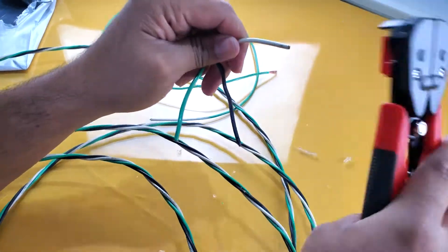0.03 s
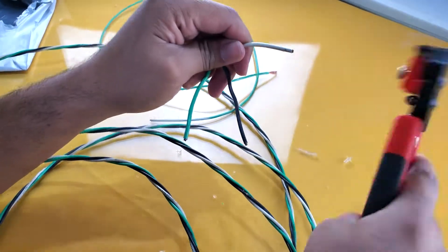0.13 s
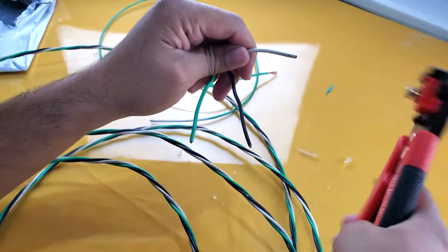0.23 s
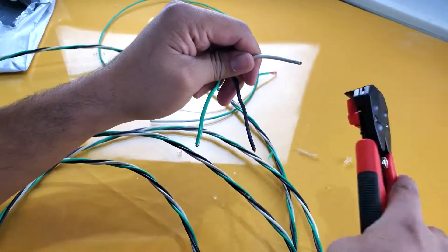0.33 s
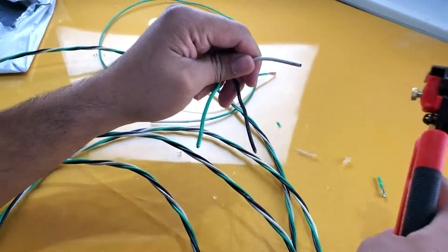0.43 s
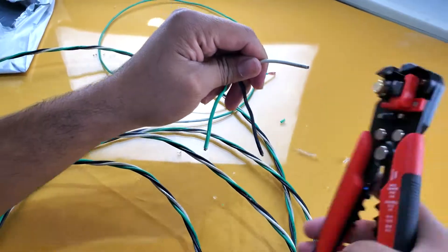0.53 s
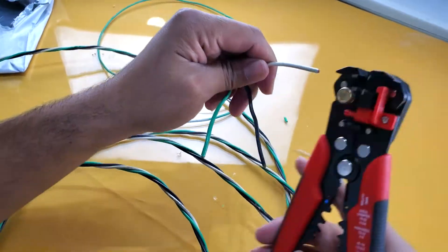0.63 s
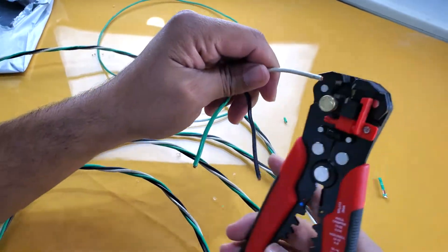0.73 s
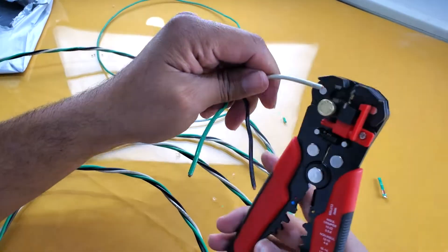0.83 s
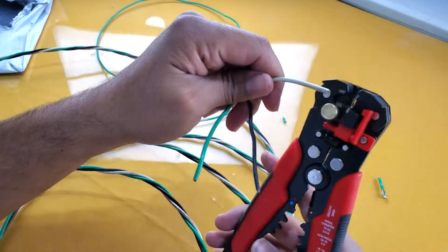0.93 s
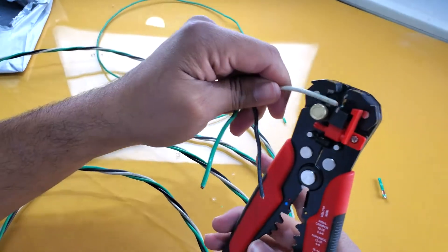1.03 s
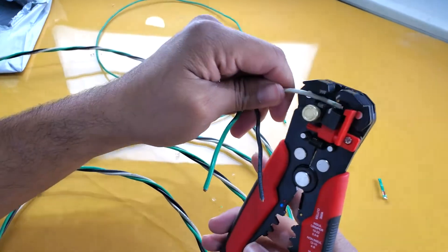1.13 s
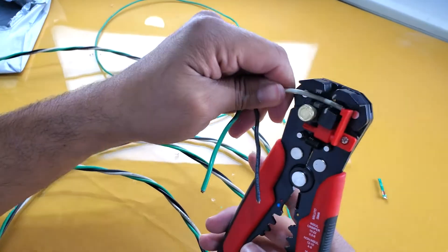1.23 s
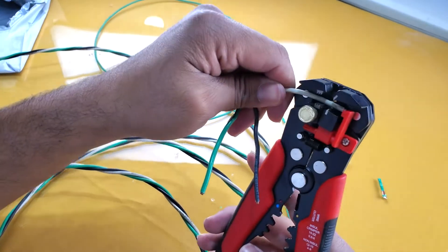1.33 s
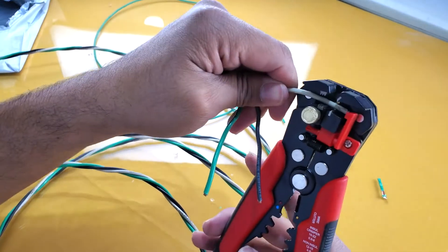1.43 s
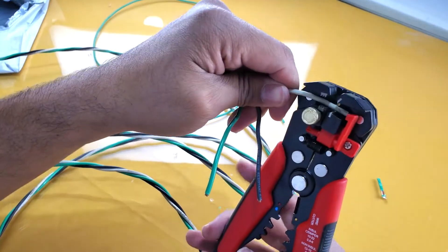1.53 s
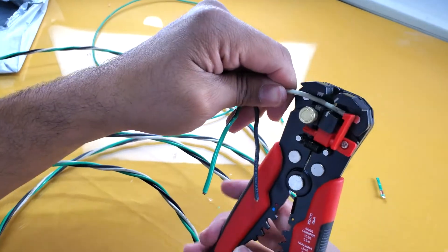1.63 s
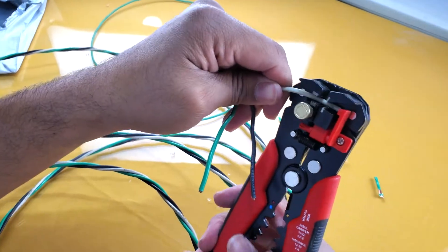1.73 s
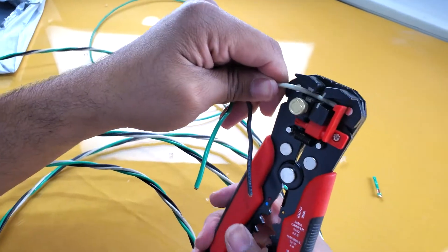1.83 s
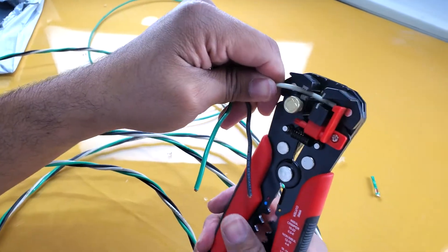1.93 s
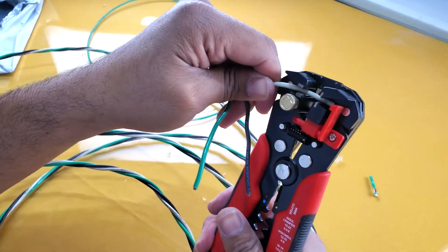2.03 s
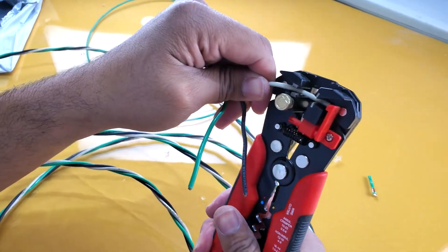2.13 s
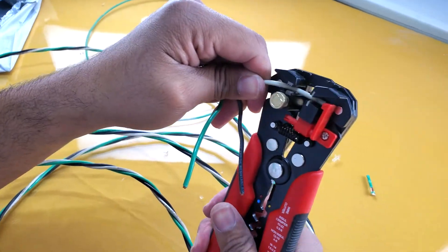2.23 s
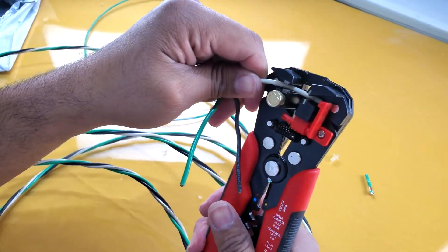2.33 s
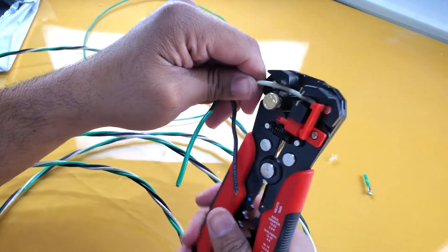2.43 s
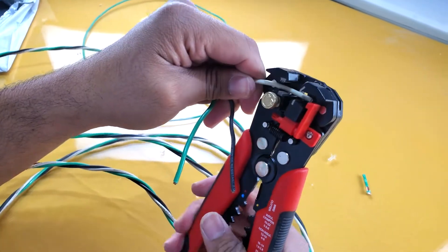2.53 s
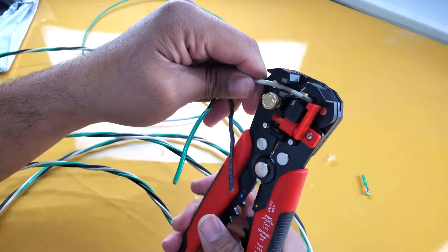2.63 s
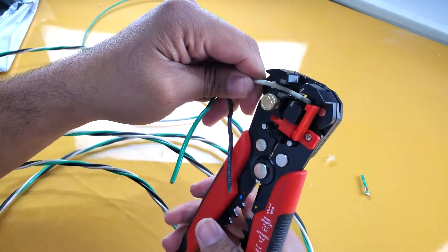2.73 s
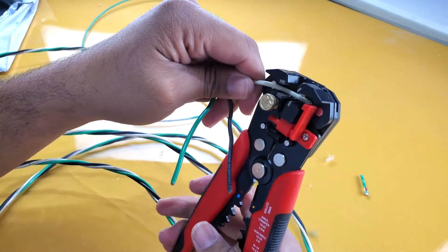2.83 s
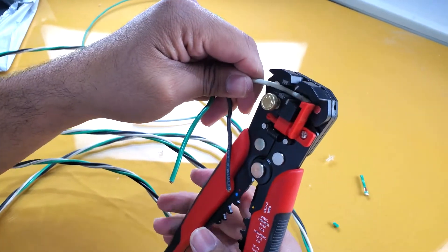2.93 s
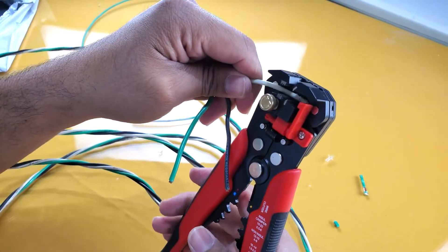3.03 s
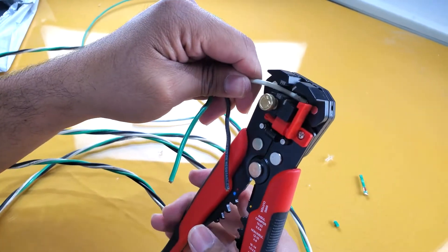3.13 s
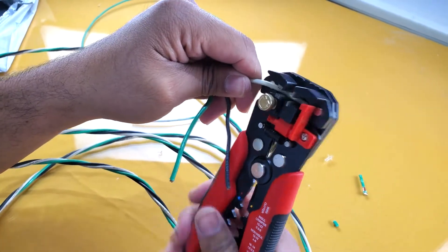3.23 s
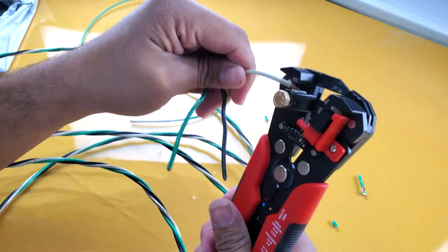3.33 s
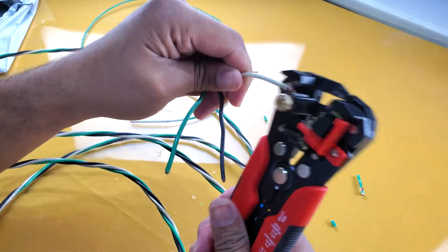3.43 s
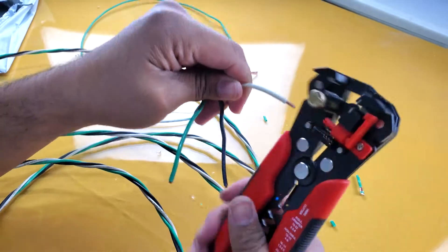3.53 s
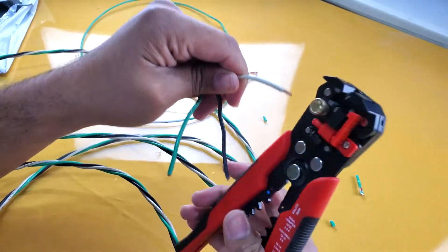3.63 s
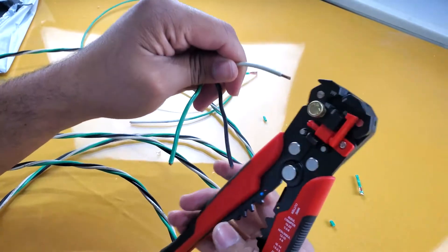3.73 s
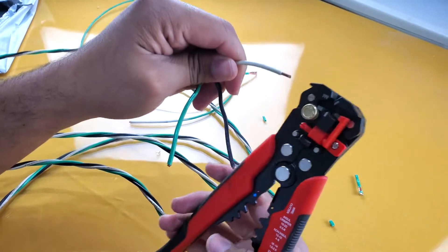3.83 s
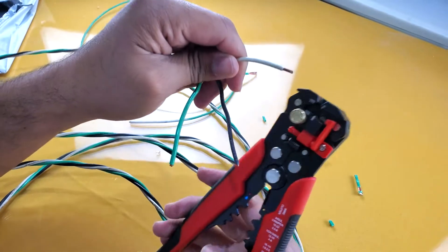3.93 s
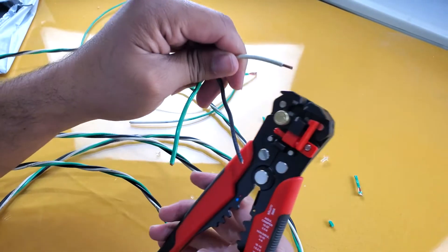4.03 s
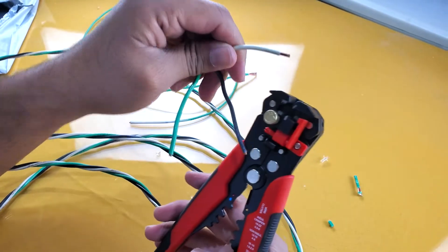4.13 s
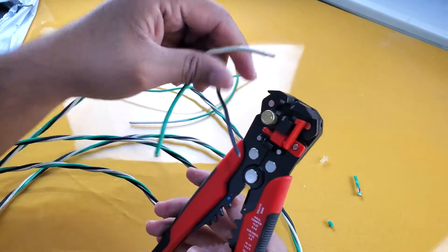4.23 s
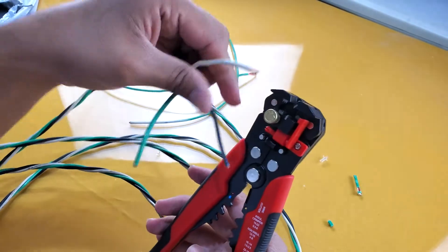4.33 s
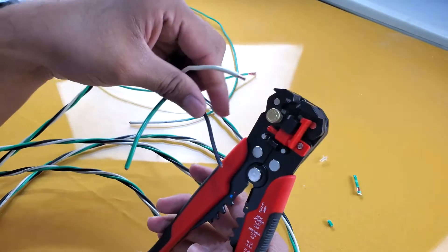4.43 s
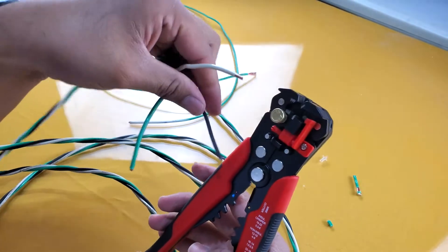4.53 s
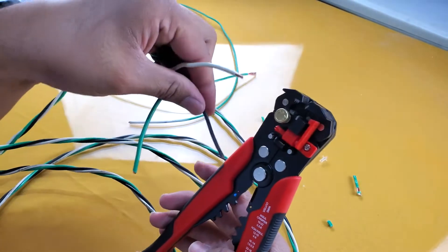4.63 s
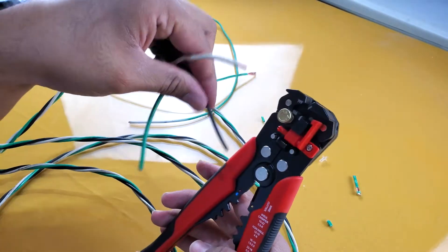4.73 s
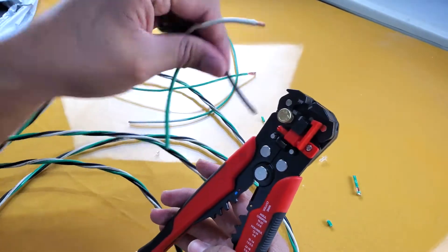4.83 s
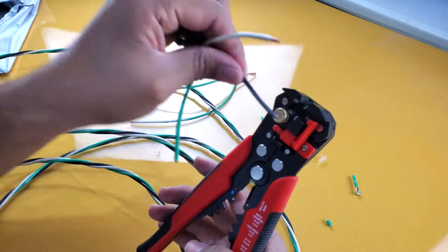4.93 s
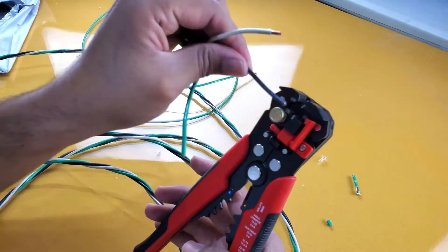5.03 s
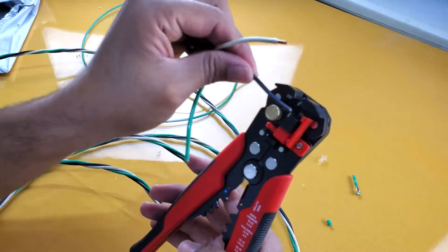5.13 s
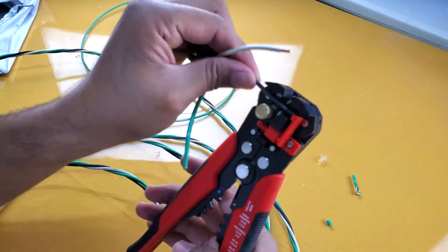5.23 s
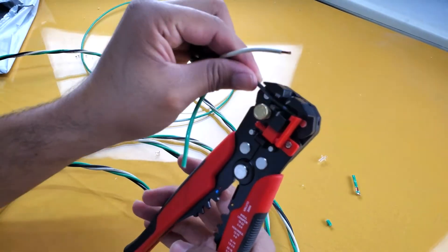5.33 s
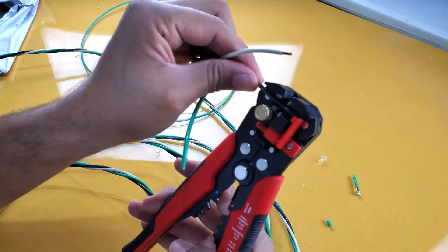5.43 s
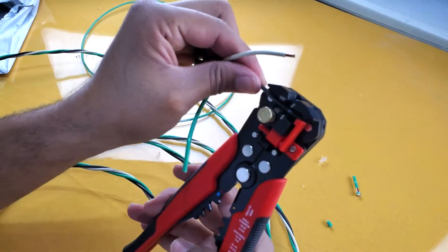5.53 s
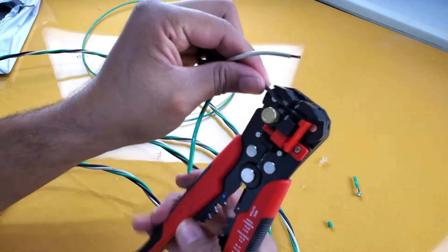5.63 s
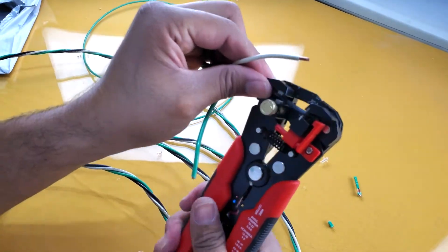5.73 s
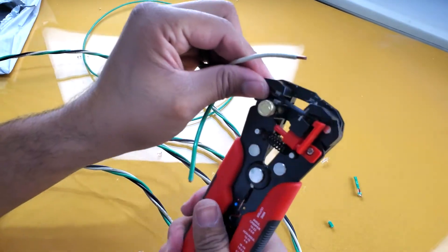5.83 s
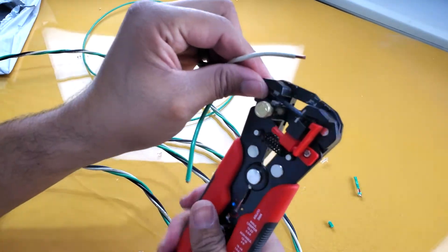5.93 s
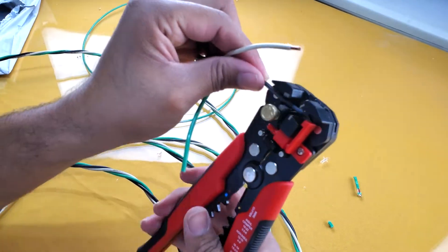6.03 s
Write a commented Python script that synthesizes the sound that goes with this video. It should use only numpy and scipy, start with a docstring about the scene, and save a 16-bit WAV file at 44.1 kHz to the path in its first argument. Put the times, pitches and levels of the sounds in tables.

```python
"""Wire stripper at the bench

Close microphone in a small hard room: a spring-loaded wire stripper is worked by hand over a bench.
Jaws, cam and latch click as bursts of micro-impacts ringing the tool; its spring buzzes, loose parts ping.
Wires rub, squeak and slap as friction noise through resonances; the bench thuds and rumbles under pushes.
The tool has a short echo of decaying noise; shaped noise makes a faint steady hiss below."""
import sys
import numpy as np
from scipy import signal
from scipy.fft import rfft, irfft
from scipy.io import wavfile

SR = 44100
rng = np.random.default_rng(int(sys.argv[2]) if len(sys.argv) > 2 else 0)


def file_out(sig):
    """Save sig as 16-bit WAV at sys.argv[1]."""
    # one column per channel
    cols = np.atleast_2d(sig).T
    # limit, then scale
    lim = np.clip(cols, -1, 1)
    pcm = np.round(lim * 32767).astype(np.int16)
    wavfile.write(sys.argv[1], SR, pcm)


N = 267907


def from_db(db):
    """Decibels become an amplitude gain."""
    return 10 ** (np.asarray(db) / 20)


def rms(x):
    """Root mean square."""
    return np.sqrt(np.mean(x ** 2) + 1e-20)


def rms_one(x):
    """Scaled to rms 1."""
    return x / rms(x)


def at_hz(hz, points, column=1):
    """A table whose first column is frequency, read on a log-frequency axis."""
    points = np.array(points)
    return np.interp(np.log(np.maximum(hz, 1)), np.log(points[:, 0]), points[:, column])


def band(x, low_hz, high_hz, order):
    """Butterworth band-pass."""
    sections = signal.butter(order, [low_hz, high_hz], "band", fs=SR, output="sos")
    return signal.sosfilt(sections, x + 1e-18)


def drift(rate_hz):
    """Slow random wander of rms 1: white noise through two equal low-pass poles."""
    r = np.exp(-2 * np.pi * rate_hz / SR)
    settle = 9000   # samples dropped while the filter settles
    wander = signal.lfilter([1], [1, -2 * r, r * r], rng.standard_normal(N + settle))
    return rms_one(wander[settle:])


def ring(push, hz, t60):
    """A damped mode: a unit click starts a sine of height 1 that falls 60 dB in t60 seconds."""
    r = from_db(-60 / (t60 * SR))
    w = 2 * np.pi * hz / SR
    return signal.lfilter([0, np.sin(w)], [1, -2 * r * np.cos(w), r * r], push + 1e-18)


def resonate(x, peaks):
    """Parallel resonances with alternating signs; the sum has rms 1."""
    out = 0
    for k, (hz, width_hz, level_db) in enumerate(peaks):
        r = np.exp(-np.pi * width_hz / SR)
        poles = [1, -2 * r * np.cos(2 * np.pi * hz / SR), r * r]
        resonance = signal.lfilter([(1 - r * r) / 2, 0, (r * r - 1) / 2], poles, x)
        out = out + (-1) ** k * from_db(level_db) * resonance
    return rms_one(out)


def friction(grain_share, lumpy_db, lump_rate_hz):
    """Sliding noise: a smooth part plus sparse slips of uneven size, coming in lumps."""
    slip_size = from_db(3.5 * np.minimum(rng.exponential(1, N), 4))
    slips = (rng.random(N) < 600 / SR) * rng.standard_normal(N) * slip_size   # about 600 slips a second
    share = np.clip(grain_share, 0, 1)
    mix = np.sqrt(1 - share) * rng.standard_normal(N) + np.sqrt(share) * rms_one(slips)
    return mix * from_db(lumpy_db * drift(lump_rate_hz))


def sliding(peaks, low_hz, high_hz, grain_share):
    """Friction noise heard through a few resonances, at rms 1."""
    coloured = resonate(friction(grain_share, 2.6, 25), peaks)
    return rms_one(band(coloured, low_hz, high_hz, order=2))


def dying(rows):
    """Envelope of sudden starts (t/s, level/dB, t60/s) that die away."""
    t = np.arange(N) / SR
    out = 0
    for s, level_db, t60 in rows:
        out = out + from_db(level_db - 60 * np.abs(t - s) / max(t60, .01)) * (t >= s)
    return out


def swells(rows, column, fall_db_per_s):
    """Envelope of movements that swell at their own pace, hold, and all fade at one rate; powers add."""
    t = np.arange(0, N + 64, 64) / SR   # a coarse grid is enough
    rows = np.array(rows)[:, :, None]
    since = t - rows[:, 0]
    rise_db = 20 * np.minimum(since, 0) / np.maximum(rows[:, 1], .005)
    fall_db = fall_db_per_s * np.maximum(since - np.abs(rows[:, 2]), 0)
    level_db = rows[:, column] + rise_db - fall_db
    envelope = np.sqrt(np.sum(from_db(2 * level_db), axis=0))
    return np.interp(np.arange(N) / SR, t, envelope)


def hiss():
    """Steady room and microphone noise: white noise given a fixed spectrum."""
    # hiss spectrum: f/Hz, relative density level/dB
    hiss_spectrum = [(15, -30.5), (25, 0.5), (82, -1), (200, -17), (277, -16.5), (416, -33), (1020, -32.5),
                     (1330, -38), (2610, -37.5), (3920, -40), (7110, -44), (12900, -45), (16000, -69)]
    shape = from_db(at_hz(np.arange(N // 2 + 1) * SR / N, hiss_spectrum))
    noise = irfft(rfft(rng.standard_normal(N)) * shape, N)
    return from_db(-62.5) * rms_one(noise)


def room(x):
    """Echo off the hard walls: dense noise that fades in within a millisecond and dies band by band."""
    # room decay: f/Hz, t60/s, relative level/dB
    room_bands = [(150, .5, -1.5), (700, 0.9, 5.5), (1820, 0.12, 8), (4900, 0.4, 3.5), (7000, 0.33, 5),
                  (9250, 0.23, 4), (14700, 0.12, 1.5)]
    t = np.arange(int(.6 * SR)) / SR
    edges = 90 * 2 ** np.arange(0, 7.6, .5)   # half-octave bands from 90 Hz
    echo = 0
    for low, high in zip(edges, edges[1:]):
        hz = np.sqrt(low * high)
        noise = band(rng.standard_normal(len(t)), low, high, order=2)
        fall = from_db(-60 * t / at_hz(hz, room_bands, column=1))
        level = from_db(at_hz(hz, room_bands, column=2))
        echo = echo + noise * fall / np.sqrt(np.sum(fall ** 2)) * level
    onset = np.clip(t / 0.00081, 0, 1) ** 2
    return signal.fftconvolve(x, echo * onset)[:N]


def thuds():
    """Blows through the bench: a soft onset, then the top swings as a sine that dies away."""
    # thuds: t/s, relative level/dB, f/Hz, t60/s
    thud_rows = [(0.048, -31.5, 67.4, 0.24), (0.099, -28.5, 63.6, 0.13), (0.32, -39, 63.4, 0.14),
                 (0.903, -33, 80, 0.1), (1.207, -48, 72, 0.27), (1.588, -28.5, 66, 0.2),
                 (1.795, -40, 294.4, 0.33), (2.217, -38, 280, 0.29), (2.416, -37.5, 81, 0.21),
                 (2.58, -29, 123.4, 0.28), (2.806, -26.5, 74, 0.089), (2.902, -43, 71.3, 0.53),
                 (3.148, -29, 76, 0.1), (3.271, -15, 169, 0.086), (3.281, -11, 86, 0.11),
                 (3.308, -13, 59.5, 0.12), (3.349, -16.5, 81, 0.16), (3.399, -28.5, 132, 0.78),
                 (3.903, -33, 127, 0.46), (4.075, -35, 137.7, 0.18), (4.936, -38, 99.6, 0.12),
                 (5.755, -26, 54.6, 0.11), (5.754, -29.5, 330, 0.028), (5.91, -19, 71.6, 0.065),
                 (5.963, -21, 390, 0.022)]
    out = np.zeros(N)
    for s, level_db, hz, t60 in thud_rows:
        start = int(s * SR)
        t = np.arange(min(SR // 2, N - start)) / SR
        decay = from_db(-60 * t / max(t60, .02))
        swing = np.sin(2 * np.pi * hz * t) * decay * (1 - np.exp(-4 * hz * t))
        out[start:start + len(t)] += from_db(level_db - 3.5) * swing
    return out


def bench_top():
    """The hollow knock of the bench top: lumpy friction noise through its resonances, at rms 1."""
    # knock resonances of the top: f/Hz, width/Hz, relative level/dB
    knock_peaks = [(191.4, 140, -1.5), (285, 22, 7), (305, 31, 1.5), (417, 138, -0.5), (538, 120, -2.5),
                   (676, 220, -13.5)]
    return resonate(friction(0.29, 1.6, 30), knock_peaks)


def dull_rubbing():
    """Dull rubbing on the bench: friction noise in a few middle resonances, at rms 1."""
    # dull rubbing resonances: f/Hz, width/Hz, relative level/dB
    rub_peaks = [(692, 460, -1.5), (1246, 220, 2.5), (1400, 230, 2.5)]
    return sliding(rub_peaks, 500, 1900, 0.49)


def pushes(top):
    """Hands and wires push on the bench: low rumble and the knock of the top swell and fade over a rest level."""
    # pushes: arrival t/s, time to swell by 20 dB/s (at least 5 ms), hold/s, rumble level/dB, knock level/dB
    push_rows = [(0, .03, 0.04, -39.5, -46), (0.4, 0.07, 0.05, -55, -57), (0.585, 0, 0.062, -56, -58.5),
                 (0.68, 0.1, 0.063, -47, -49.5), (0.955, 0.1, 0.028, -52.5, -54),
                 (1.58, 0.04, 0.035, -56, -61), (1.79, -0.3, 0.042, -54, -62),
                 (1.92, 0.65, 0.048, -66.5, -69), (2.07, -2, 0.13, -66.5, -75.5),
                 (2.25, 0.08, 0.0017, -49.5, -52), (2.44, 0.14, 0.03, -59, -52),
                 (2.535, 0.04, 0.062, -42.5, -46), (2.8, 0, 0.02, -49, -60),
                 (2.925, 0.05, 0.015, -52.5, -59.5), (3.155, -0.02, 0, -45, -52.5),
                 (3.23, -0.35, 0, -60.5, -45), (3.283, -0.0357, 0, -42.5, -30),
                 (3.33, -0.05, 0.11, -38.5, -35), (3.45, -0.14, 0.2, -46, -43.5),
                 (3.6, -0.46, 0.06, -45.5, -54), (3.93, 0.07, 0.025, -57, -50.5),
                 (4.06, -0.5, 0.035, -52.5, -51.5), (4.24, 0.36, 0.12, -57, -56),
                 (4.38, 0.05, 0.081, -50.5, -48), (4.58, 0.16, 0.034, -46, -52.5),
                 (4.77, -0.5, 0.031, -53.5, -57), (4.94, 0.18, 0.028, -45, -47.5),
                 (5.08, -0.5, 0.084, -57, -61.5), (5.25, 0.07, 0.16, -54, -59.5),
                 (5.6, 0.3, 0.06, -48.5, -57.5), (5.735, 0.05, 0.055, -37, -41.5), (5.85, -2, 0, -66, -46),
                 (5.965, 0.5, 0.0033, -43.5, -49.5), (6.01, -1.1, 0.0036, -66, -47)]
    # rumble resonances: f/Hz, width/Hz, relative level/dB
    rumble_peaks = [(48, 21.7, -1.5), (69, 26, 1.5), (127, 25, -2)]
    rumble_level = from_db(-64.5) + swells(push_rows, column=3, fall_db_per_s=112)
    knock_level = from_db(-78.5) + swells(push_rows, column=4, fall_db_per_s=191)
    rumble = resonate(friction(0.092, 1.6, 3.1), rumble_peaks)
    return rumble_level * rumble + knock_level * top


def slaps(top, rubbing):
    """A wire slaps the bench top: knock and rubbing noise start at once and die away together."""
    # wire slaps: t/s, relative level/dB, t60/s
    slap_rows = [(1.784, -31, 0.33), (2.217, -32.5, 0.26), (2.529, -22, 0.35), (3.23, -38, 0.21),
                 (3.889, -32, 0.19), (4.234, -40, 0.19), (4.942, -32.5, 0.08)]
    return from_db(-18.5) * dying(slap_rows) * (top + from_db(-3.5) * rubbing)


def strokes(rubbing):
    """Wires and fingers slide: dull rubbing, thin rubbing and bright rustle swell and fade with each stroke."""
    # strokes: arrival t/s, time to swell by 20 dB/s (at least 5 ms), hold/s,
    # dull rubbing level/dB, thin rubbing level/dB, bright rustle level/dB
    stroke_rows = [(0, .05, 0.007, -53, -60, -58.5), (0.1, 5, 0.089, -76, -82, -79),
                   (0.43, 0.19, 0.035, -66, -86, -63.5), (0.59, -0.06, 0.16, -102, -88, -60.5),
                   (0.65, 0, 0.15, -71, -89, -79), (0.8, 0.5, 0.078, -71.5, -72.5, -68.5),
                   (0.96, -1.37, 0.03, -64.5, -72.5, -68), (1.13, -1.5, 0.023, -90, -75, -79),
                   (1.25, 0.2, .04, -77, -89, -83), (1.54, -0.2, 0.034, -75, -79, -67),
                   (1.785, 0.1, 0.016, -67, -62.5, -59), (1.9, 1.5, 0.12, -80.5, -86, -79.5),
                   (2.25, 0.5, 0.051, -76, -91, -78.5), (2.43, 0.1, 0.029, -62.5, -80, -72),
                   (2.54, -0.21, 0.057, -60, -59, -53.5), (2.66, 0.35, 0.083, -75, -79, -71.5),
                   (2.83, -0.52, 0.042, -68, -77.5, -56.5), (2.97, 0.4, 0.046, -89, -72, -65),
                   (3.205, -0.23, 0.026, -58, -64, -51.5), (3.3, -0.2153, 0.093, -41, -41.5, -40.5),
                   (3.42, 0.06, 0.084, -44.5, -70, -50), (3.55, -0.3, 0.15, -53.5, -62, -64.5),
                   (3.75, 0.1, 0.036, -85.5, -77.5, -68), (3.893, 0, 0.1, -69.5, -80, -71.5),
                   (4.06, 0, 0.062, -62.5, -75, -86), (4.24, 0.17, 0.072, -61, -73, -81),
                   (4.355, -0.46, 0.071, -56.5, -74, -66), (4.41, 0.1, 0.1, -52, -64.5, -66.5),
                   (4.57, -1.56, 0.041, -63.5, -77, -69), (4.755, 0.24, 0.019, -73, -86.5, -84.5),
                   (4.79, 0, 0.1, -74, -79.5, -69), (4.92, 0.05, 0.04, -56, -65, -61),
                   (5.06, 0.2, 0.045, -72, -87.5, -85), (5.23, 0.16, 0.11, -71, -77, -80),
                   (5.262, -1.9, 0.032, -75, -73, -67), (5.63, 0.18, .02, -64.5, -87, -74),
                   (5.74, -0.21, 0.076, -55, -57, -70), (5.86, -0.3, 0.14, -57.5, -82, -65),
                   (6.03, -0.02, 0.046, -64, -57.5, -53)]
    # thin rubbing resonances: f/Hz, width/Hz, relative level/dB
    thin_peaks = [(2385, 2200, 7), (2323, 100, -5.5)]
    # bright rustle resonances: f/Hz, width/Hz, relative level/dB
    rustle_peaks = [(2980, 420, -3.5), (3300, 590, -1.5), (3730, 390, 1.5), (4370, 410, 0.5),
                    (5200, 1700, -8.5), (7000, 840, -15)]
    dull_level = swells(stroke_rows, column=3, fall_db_per_s=220)
    thin_level = swells(stroke_rows, column=4, fall_db_per_s=220)
    rustle_level = swells(stroke_rows, column=5, fall_db_per_s=202)
    thin = sliding(thin_peaks, 1600, 2200, 0.27)
    rustle = sliding(rustle_peaks, 2600, 6300, 0.051)
    return dull_level * rubbing + thin_level * thin + rustle_level * rustle


def handling():
    """Hands and wires on the bench: pushes, slaps and strokes share the noise of the top and the rubbing."""
    top = bench_top()
    rubbing = dull_rubbing()
    return pushes(top) + slaps(top, rubbing) + strokes(rubbing)


def squeaks():
    """Faint narrow squeaks as something drags: smooth noise twice through one narrow resonance."""
    # squeaks: arrival t/s, time to swell by 20 dB/s (at least 5 ms), hold/s, level/dB, f/Hz, width of each pass/Hz
    squeak_rows = [(0.1, 0, 0.059, -70, 3910, 210), (0.69, 0.22, 0.12, -65, 2180, 280),
                   (0.69, 0.1, 0.063, -61, 1280, 350), (1.13, 0.3, .04, -79, 2240, 210),
                   (1.192, 0.1, 0.087, -75, 4320, 210), (1.86, -1.16, 0.12, -72, 3650, 208),
                   (4.353, 0, 0.075, -60, 3700, 602), (4.791, 0.1, 0.14, -70.5, 3800, 299),
                   (5.262, -0.17, 0.027, -66.5, 2207, 219.7), (5.262, -0.4, 0.065, -69, 3570, 250)]
    out = 0
    for row in squeak_rows:
        peak = [(row[4], row[5], 0)]
        tone = resonate(resonate(rng.standard_normal(N), peak), peak)
        out = out + swells([row], column=3, fall_db_per_s=254) * tone
    return out


def pings():
    """Small loose parts ping as the jaws fall back: each is one short ring."""
    # pings: t/s, level/dB, f/Hz, t60/ms
    ping_rows = [(5.966, -41, 6400, 47), (5.965, -45, 8200, 40), (0.635, -57, 1250, 35),
                 (0.96, -57, 1280, 34), (3.4755, -39.5, 6200, 16), (3.5, -42, 9200, 7.7),
                 (3.502, -34.5, 6190, 21), (3.557, -30, 9800, 5.5), (3.599, -16.5, 5500, 7.6),
                 (3.599, -22, 9500, 5.7), (3.642, -21, 7100, 9.3), (5.966, -30, 1554, 40),
                 (5.831, -38, 1505, 55)]
    out = np.zeros(N)
    for s, level_db, hz, t60_ms in ping_rows:
        blow = from_db(level_db) * (np.arange(N) == int(s * SR))
        out += ring(blow, hz, max(t60_ms, 3) / 1000)
    return out


def spring():
    """Jolted coils chatter on each other: rough noise twice through resonances, and a bright sizzle above."""
    # jolts of the return spring: t/s, buzz level/dB, t60/s, sizzle level before its band-pass/dB
    jolt_rows = [(3.287, -46, 0.45, -35.5), (3.535, -32, 0.05, -50), (5.725, -35.5, 0.35, -53),
                 (5.832, -52, 0.3, -79), (5.965, -36.5, 0.033, -42.5)]
    # spring resonances: f/Hz, width of each pass/Hz, relative level of each pass/dB
    spring_peaks = [(3050, 190, 0), (3320, 200, -1.5), (3620, 220, -2.5), (4090, 260, 0.5),
                    (4550, 260, -2.5), (5070, 190, -0.5)]
    s, buzz_db, t60, sizzle_db = np.transpose(jolt_rows)
    jolted = dying(zip(s, buzz_db, t60))
    chatter = jolted * friction(0.41, 2.0, 40)
    buzz = resonate(resonate(chatter, spring_peaks), spring_peaks) * rms(jolted)
    sizzle = dying(zip(s, sizzle_db, t60)) * friction(0.33, 1.5, 40)
    return buzz + band(sizzle, 5500, 9200, order=2)


def clicks():
    """Each contact is a brief rattle of micro-impacts: it strikes the modes unevenly and cracks in the treble."""
    # metal and plastic contacts: t/s, relative level/dB, brightest f/Hz, low part re level/dB,
    # treble re level/dB, contact length/ms (limited to 0.2-8 below)
    click_rows = [(0.393, -22, 4340, -14, -21, 3), (0.544, -32.5, 4150, -43.5, -25, 5.9),
                  (0.573, -37, 4020, -41, -27, 3), (0.952, -52.5, 4030, 0, -25.5, 1.4),
                  (1.126, -48, 3870, -3, -27.5, 0.98), (1.185, -45.5, 4340, -21.5, -22, 0.9),
                  (1.5341, -35, 4140, -9, -35, 1.8), (1.7312, -25.5, 4100, -22, -27.5, 2.2),
                  (1.738, -26, 4130, -12, -19, 3.2), (1.7714, -32, 3600, -6.5, -40, 1.6),
                  (1.784, -46, 3300, 12, -43, 1.6), (1.964, -46.5, 3500, -32, -26, 6.6),
                  (2.0575, -53, 4170, 0, -21, 1.8), (2.173, -51, 4800, -3, 15, 1.6),
                  (2.2168, -49.5, 3850, -9, -34, 2.7), (2.432, -52, 3420, 13.5, -20, 1.1),
                  (2.452, -30, 3600, -1, -20, 1.4), (2.488, -16, 4650, -17, -16.5, 2.5),
                  (2.4968, -21, 3960, -11.5, -17, 1.1), (2.5156, -6.5, 4160, -11, -21.5, 0.15),
                  (2.5294, -31.5, 3430, 7.5, -27, 3.8), (2.54, -39, 3500, 10, -30, 2.2),
                  (2.5637, -26.5, 3580, -2, -29, 1.7), (2.808, -31, 4030, -17, -33, 3.4),
                  (2.814, -24, 4900, -15, -33, 8), (2.923, -23.5, 3430, -8, -19, 2.4),
                  (2.9245, -22, 5800, -41, -1, 0.18), (2.9482, -21, 3600, -11, -17.5, 2.5),
                  (3.182, -37.5, 3730, -19, 1, 1.5), (3.205, -32.5, 3420, -23, -24, 4),
                  (3.223, -35, 3900, -20, -40, 1.2), (3.273, -12.5, 3500, -11, -19, 10),
                  (3.2801, -2, 3480, -3.5, -13, 3.2), (3.2836, -2, 3400, -11, -7.5, 2.7),
                  (3.2863, 1.5, 4900, -8, -8.5, 0.8), (3.288, -11, 5000, -24, 0, 4.9),
                  (3.323, -23, 3150, -24, 2, 1.7), (3.3538, -21, 3550, 2.5, -15, 1),
                  (3.3831, -22, 3650, 0, -12, 1.1), (3.397, -19.5, 3920, -18, -22, 0.75),
                  (3.4465, -21.5, 4200, 2, -36, 3), (3.475, -26.5, 3530, -3, -24, 4.9),
                  (3.501, -34, 3670, -11, -24, 2.7), (3.52, -25, 4360, -7, -19, 1.5),
                  (3.535, -22.5, 4170, -2, -36, 7.7), (3.5565, -20.5, 4470, -8, -13.5, 6.7),
                  (3.574, -24, 3680, -2, -22, 1.7), (3.581, -29, 3700, 1, -23, 1.7),
                  (3.599, -12, 5500, -23, -16, 1.7), (3.6381, -24, 3500, -6, 3.5, 2.2),
                  (3.661, -18.5, 4520, -12, -41, 0.89), (3.6857, -42, 3326, 12.5, -10.5, 1.8),
                  (3.705, -48.5, 3400, 10.5, -20.5, 2.6), (3.8903, -48.5, 3610, 3, -26.5, 1.26),
                  (3.913, -48, 3560, -0.5, -27, 1.5), (3.953, -52.5, 3700, 13, -25.5, 1.55),
                  (4.023, -49.5, 2940, 8, -20.5, 1.5), (4.0556, -49.5, 3360, 13, -26.5, 1.16),
                  (4.0734, -51.5, 3150, 15, -24.5, 0.67), (4.238, -42.5, 3550, 12, -30, 0.87),
                  (4.3767, -36.5, 3640, 12, -35, 2.7), (4.4102, -40, 3700, 5, -34.5, 1.4),
                  (4.4315, -37.5, 3590, 7.5, -32, 2.1), (4.4706, -46, 3560, 7.5, -33, 1.1),
                  (4.4965, -48.5, 3660, 11, -26, 1.2), (4.592, -46.5, 3790, -7, -30, 4.2),
                  (4.9078, -27.5, 3600, -2.5, -40, 1.48), (4.945, -46, 3296, 16, -33.5, 2.36),
                  (5.225, -50, 3620, 8, -25, 1.3), (5.261, -40.5, 3450, -8.5, -18, 7.5),
                  (5.2984, -37.5, 3600, -18, -23, 2.2), (5.583, -56, 3260, 7, -29, 2.3),
                  (5.6503, -42.5, 3400, -4, -29, 1.8), (5.6719, -25, 5860, -7, -29, 2.5),
                  (5.686, -31.5, 4200, -10.5, -24.5, 2.7), (5.693, -20, 3830, -7.5, -11, 3.1),
                  (5.707, -21.5, 4900, -9, -32, 4.6), (5.7233, -11.5, 4000, -11.5, -16, 4.5),
                  (5.754, -25, 4100, -7, -14, 1.7), (5.804, -37, 3570, 5, -26, 0.99),
                  (5.8322, -25.5, 3660, -9, -14.5, 6.2), (5.857, -44.5, 3540, 12, -25, 1.2),
                  (5.916, -47, 3630, 12, -32, 1.6), (5.9644, -22.5, 4280, -13.5, -16, 9),
                  (5.985, -19, 3970, -22, -17.5, 2.8), (5.9967, -23, 4160, -0.5, -20, 1.1),
                  (6.0016, -15, 5000, -10, -12.5, 2.2), (6.0177, -13.5, 5100, -8.5, -11, 1),
                  (6.0534, -26.5, 4940, -1.5, -19, 4)]
    # modes of the tool, damped by the hand: f/Hz, relative level/dB
    tool_modes = [(506, -2.5), (760, -16.5), (1200, -5.5), (1420, -4.5), (1700, -2), (1980, -1),
                  (2170, -3.5), (2520, -11.5), (2750, -10.5), (3050, -3), (3280, -1), (3520, 6), (3800, 0),
                  (4100, 0.5), (4400, -4.5), (4700, 2), (5050, 1.5), (5400, -2), (5800, 2.5)]
    mode_t60_s = .008
    evenness = .75   # 0 = modes are struck by pure chance, 1 = always alike
    s, peak_db, bright_hz, low_db, treble_db, length_ms = np.transpose(click_rows)
    t = np.arange(900) / SR
    phase = t / (np.clip(length_ms, .2, 8)[:, None] / 1000)
    shape = (1 - np.exp(-t / 0.0005)) * np.exp(-2 * phase)
    shape /= np.sqrt(np.sum(shape ** 2, axis=1, keepdims=True))
    starts = (s * SR).astype(int)[:, None]
    at = np.minimum(starts + np.arange(len(t)), N - 1).ravel()

    def rattle(level_db, hz=0):
        """One train of all contacts, fresh noise under each; a mode at hz gets nearly the same share from all."""
        noise = rng.standard_normal(shape.shape)
        sharp_blow = 0.45 * np.sign(noise[:, :1]) * (t == t[4])   # one sharp blow near the start
        bursts = noise * shape + sharp_blow
        # luck: how strongly chance made this burst strike the mode
        luck = np.abs(bursts @ np.exp(2j * np.pi * hz * t)) if hz else 1
        gain = from_db(level_db - 3.5) / np.maximum(luck, .4) ** evenness
        bursts *= gain[:, None]
        return np.bincount(at, bursts.ravel(), N)

    low, mid = np.zeros((2, N))
    for hz, level_db in tool_modes:
        if hz < 2700:
            struck_db = peak_db + low_db + level_db - 4.0
            low += ring(rattle(struck_db, hz), hz, mode_t60_s)
        else:   # modes near the brightest pitch of the contact are struck hardest
            octaves_off = np.abs(np.log2(hz / bright_hz))
            struck_db = peak_db + level_db - 6.5 - 23.0 * octaves_off
            mid += ring(rattle(struck_db, hz), hz, mode_t60_s)
    crack_db = peak_db + 1.0 * np.minimum(peak_db + 20.0, 0)   # soft contacts are duller
    crack = band(rattle(crack_db + treble_db + 20.0), 5000, 8800, order=3)
    crack += band(rattle(crack_db + treble_db + 16.5), 9700, 18000, order=3)
    crack += band(rattle(crack_db + 1.5), 1800, 5100, order=3)
    return band(low, 350, 2700, order=2) + band(mid, 2400, 8000, order=3) + crack


def scene():
    """Hiss, bench and wires under the tool, with the room's echo of its clicks and spring."""
    tool = clicks() + spring()
    echo = from_db(-11.5) * room(tool)
    bench = thuds() + handling() + squeaks()
    return (hiss() + bench + pings() + tool + echo)[None]


def record(dry):
    """The microphone chain rounds the highest peaks, then a steep low-pass removes what lies above 16.5 kHz."""
    top = 1.0   # level the rounded peaks cannot pass
    cutoff_hz = 16500   # 70 dB down from here up
    low_pass = signal.cheby2(12, 70, cutoff_hz, fs=SR, output="sos")
    return signal.sosfilt(low_pass, top * np.tanh(dry / top))


dry = scene()
out = record(dry)
file_out(out)
```